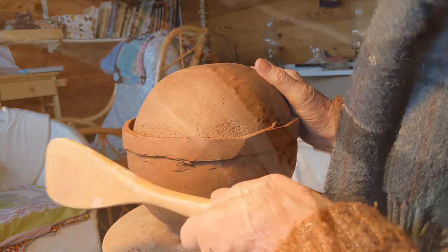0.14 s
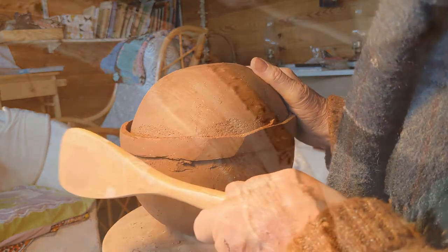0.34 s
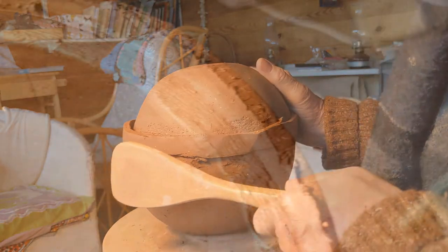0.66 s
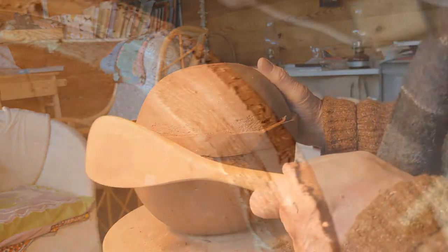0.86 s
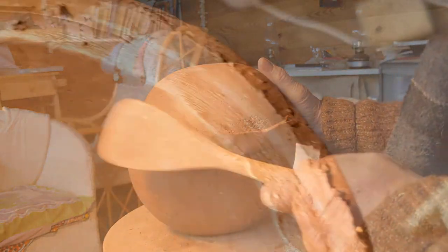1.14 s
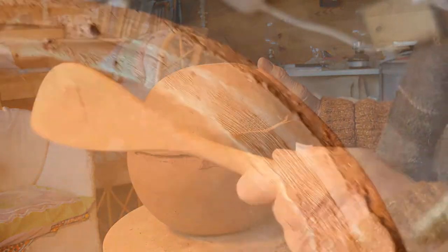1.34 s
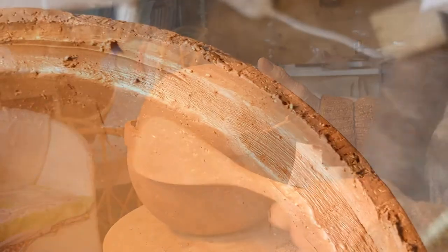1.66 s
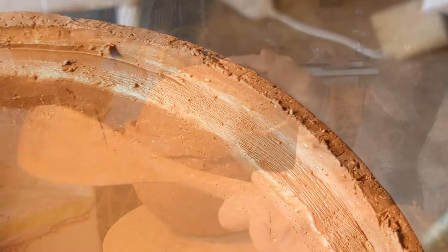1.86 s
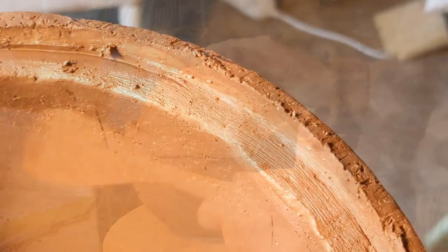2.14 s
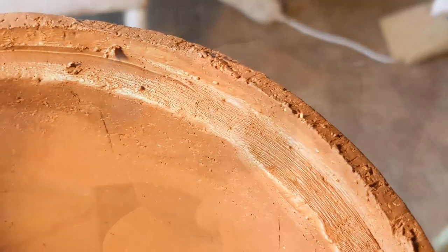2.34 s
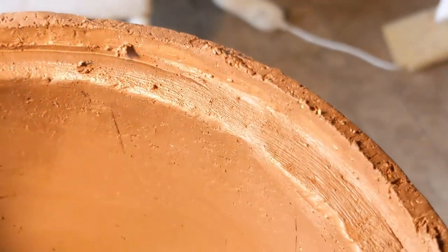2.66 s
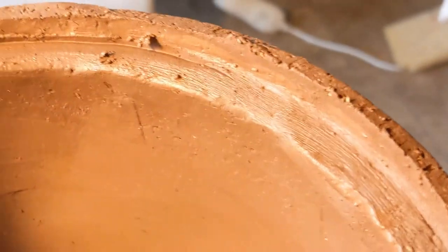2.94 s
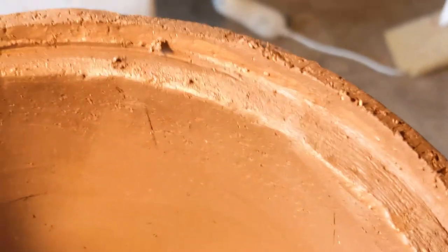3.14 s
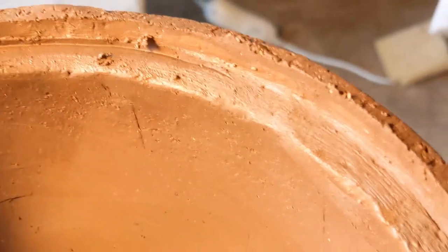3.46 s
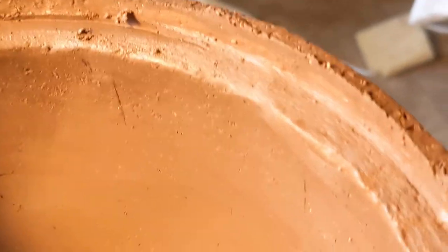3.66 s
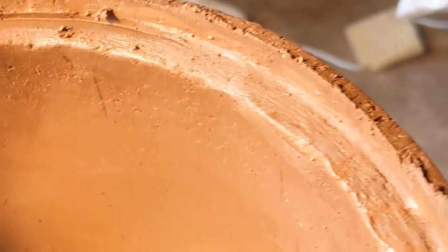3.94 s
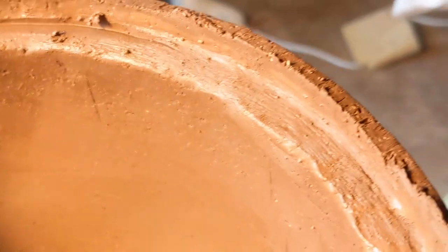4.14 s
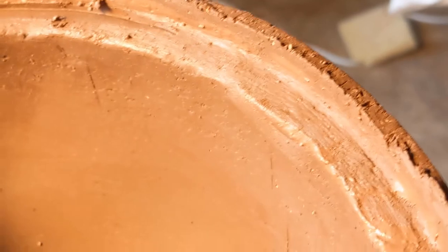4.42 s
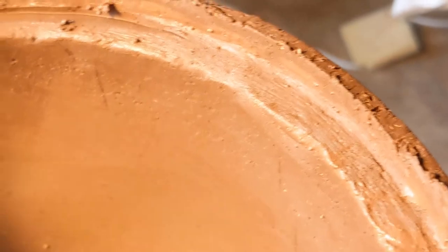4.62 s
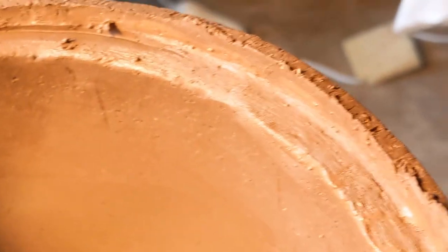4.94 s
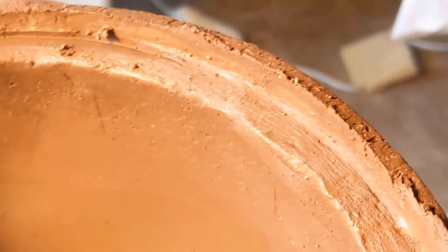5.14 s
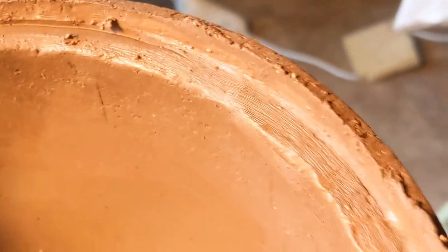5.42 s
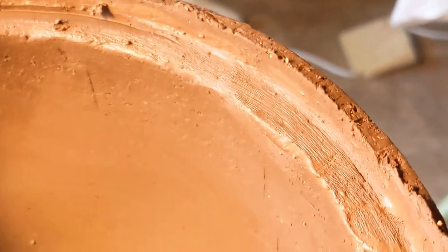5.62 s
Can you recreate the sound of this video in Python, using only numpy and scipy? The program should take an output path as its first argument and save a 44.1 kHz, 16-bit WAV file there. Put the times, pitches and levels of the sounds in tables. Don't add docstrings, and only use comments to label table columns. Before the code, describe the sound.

Quiet hiss and tiny fingertip ticks open the scene. A softer first blow leads into a very even run of sixteen loud wooden cracks, each with a brief hollow clay thump beneath and a quick room echo. Then the blows cease abruptly, and the close perspective shifts to quiet, smooth rubbing on a clay rim over growing low rumble.

```python
import sys
import numpy as np
from scipy import signal
from scipy.fft import rfft, irfft, next_fast_len
from scipy.io import wavfile

SR = 44100
rng = np.random.default_rng(int(sys.argv[2]) if len(sys.argv) > 2 else 0)


def level_to_linear(level):
    exponent = np.asarray(level, float) / 20
    return 10 ** exponent


def file_out(sig):
    cols = np.atleast_2d(sig).T
    lim = np.clip(cols, -1, 1)
    pcm = np.round(lim * 32767).astype(np.int16)
    wavfile.write(sys.argv[1], SR, pcm)


N = 255416
FORCE_N = 200
SCENE_CHANGE_S = 5.275

# start in seconds, then levels in dB of blade ring, pot thump,
# handle ring and slap brightness.
BLOWS = [(1.1912, -24, -34, -36.5, -39), (1.4564, -11.5, -27.5, -27.5, -27.5),
         (1.707, -14.5, -25, -20, -25), (1.9615, -12.5, -29, -19.5, -24.5),
         (2.2118, -14, -31.5, -17.5, -22), (2.4733, -11.5, -31.5, -20, -20),
         (2.7235, -13, -31.5, -19.5, -24.5), (2.9727, -19.5, -37, -20.5, -23),
         (3.237, -12.5, -31, -19.5, -25.5), (3.4866, -14, -30.5, -20, -25),
         (3.7383, -14, -31.5, -20, -23.5), (3.9943, -13, -30.5, -19, -27.5), (4.251, -18.5, -33, -18, -27),
         (4.5042, -15, -28, -20, -25.5), (4.761, -12.5, -30, -21, -25), (5.016, -14.5, -38.5, -22.5, -24)]


def paddle():
    # frequency in Hz, level in dB, t60 in seconds, left minus right in dB.
    knock_modes = [(754.4, -0.5, 0.0059, 1.3), (1026, -1, 0.024, 9.5), (1220, 3, 0.0073, 1),
                   (1750, -10.5, 0.0024, 1.6)]
    blade_modes = [(2087, -11.5, 0.032, -2), (2545, 1, 0.015, 7.5), (2792, -4.5, 0.023, 2),
                   (2810, 7.5, 0.0062, -0.5)]
    handle_modes = [(3573, 7, 0.0068, -1.5), (3976, 3.5, .01, 3), (4430, 6, 0.0032, 0),
                    (5220, 0.5, 0.0089, -6.5), (6034, -5.5, 0.0035, -18)]
    slap_modes = [(6823, 5, 0.0021, -21), (8240, -0.5, 0.0056, -14.5), (8650, 4.5, 0.0019, -7.5),
                  (10380, -6.5, 0.0043, -11), (12230, 2.5, 0.00067, -3), (15200, -7, 0.0054, 0.5)]
    # low edge in Hz, high edge in Hz, level in dB.
    spans = [(648, 2300, 0.5), (1930, 6700, 11), (3280, 6000, 4), (6360, 16000, 17)]
    blade_db, thump_db, handle_db, slap_db = np.array(BLOWS)[:, 1:].T
    knock_db = -26 + 0.1 * (blade_db - blade_db.mean()) + 0.3 * (thump_db - thump_db.mean())
    groups = [(knock_modes, knock_db), (blade_modes, blade_db - 3),
              (handle_modes, handle_db + 6.5), (slap_modes, slap_db + 5)]
    direct, spread = np.zeros((2, N)), np.zeros(N)
    shape = rattle(0.00012, rough=0.5)
    click = rattle(1e-6, rough=0)
    for (modes, level_db), (low_hz, high_hz, span_db) in zip(groups, spans):
        group = np.zeros((2, N))
        for k, (hz, db, t60, pan_db) in enumerate(modes):
            mode = ring(contacts(level_db + db, hz, shape), hz, t60)
            group += (-1) ** k * mode * leaning(pan_db)
        direct += high_pass(group, 0.71 * low_hz)
        push = contacts(level_db + span_db, low_hz, click) + 1e-9 * direct[0]
        spread = -spread + band_pass(push, low_hz, high_hz, order=2)
    direct += band_pass(contacts(blade_db + 10, 2000, click) + 1e-18, 1150, 4100, order=1)
    direct += high_pass(contacts(slap_db + 7, 4000, click), 1300) * leaning(2)
    mode_share = -0.08
    return direct, spread + mode_share * direct[1]


def contacts(level_db, hz, shape):
    turn = np.exp(-2j * np.pi * hz * np.arange(FORCE_N) / SR)
    shape = shape / np.maximum(np.abs(shape @ turn), 1)[:, None]
    scatter_db = rng.normal(0, 1.5, len(BLOWS))
    force = np.zeros(N)
    for s, gain, one in zip(np.array(BLOWS)[:, 0], level_to_linear(level_db + scatter_db), shape):
        at = round(s * SR)
        force[at:at + FORCE_N] += gain * one
    return force


def rattle(length_s, rough):
    t = np.arange(FORCE_N) / SR
    uneven = 1 - rough + rough * rng.standard_normal((len(BLOWS), FORCE_N))
    shape = np.exp(-t / length_s) * uneven
    shape[:, 0] = 2
    return shape


def pot():
    # frequency in Hz, level in dB, t60 in seconds.
    body_modes = [(79.5, -14.5, 0.85), (144.6, -12.5, 0.27), (181.2, -24.5, 0.45), (243.2, -7, 0.13),
                  (261.3, -12.5, 0.24), (304.7, 2, 0.047), (317.3, -8.5, 0.029), (420, -2, 0.033),
                  (478.4, 3.5, 0.022), (520, -24, 0.017)]
    thump_db = np.array(BLOWS)[:, 2] + 4
    push = rattle(0.0001, rough=0)
    body = sum(ring(contacts(thump_db + db, hz, push), hz, t60) for hz, db, t60 in body_modes)
    return high_pass(high_pass(body, 29), 180)


def turned_room(x):
    places = 3
    place = np.searchsorted(np.array(BLOWS)[:, 0] - 0.01, np.arange(N) / SR) % places
    wet = sum(room(x * (place == k)) for k in range(places))
    return signal.sosfilt(signal.cheby2(8, 30, 16300, fs=SR, output="sos"), wet)


def room(x):
    # frequency in Hz, tail level in dB, t60 in seconds, left-right likeness from 0 to 1.
    tail = [(106, -18, 0.062, 0.37), (247, -20.5, 0.32, 1), (546, -27.5, 0.21, 0.074),
            (1390, -9.5, 0.19, 0), (2700, -5.5, 0.21, 0.2), (4960, -8, .19, 0.053), (8360, -19, 0.23, 0),
            (14200, -24.5, 0.048, 0)]
    t, echo = np.arange(SR // 2) / SR, 0
    edges = 50 * 2 ** np.arange(0, 8.6, 0.5)
    for low, high in zip(edges, edges[1:]):
        hz = np.sqrt(low * high)
        mid, side = band_pass(rng.standard_normal((2, len(t))), low, high, order=2)
        t60 = at_hz(tail, hz, order=2)
        build = 1 - np.exp(-t / 0.00033)
        fall = np.exp(-np.log(1000) * t / t60) * build / np.sqrt(t60 * SR / 28)
        echo = echo + level_to_linear(at_hz(tail, hz) + 11.5) * fall * pair(mid, side, at_hz(tail, hz, order=3))
    return signal.fftconvolve(x[None], echo, axes=1)[:, :N]


def ticks():
    # start in seconds, peak in dB, frequency in Hz.
    fingertips = [
        (0.295, -56, 5800),
        (0.303, -58, 5150),
        (0.304, -56, 2310),
        (0.319, -47, 2160),
        (0.545, -55, 4100),
        (0.567, -50, 485),
        (0.574, -50, 910),
        (0.589, -45, 1470),
        (0.621, -65, 571),
    ]
    # start in seconds, peak in dB, frequency in Hz.
    crumbs = [(0.3764, -64, 9800), (0.5192, -49, 6360), (0.5447, -43, 4600), (0.5447, -54, 9500),
              (0.589, -52, 6300), (0.6115, -53, 7440), (0.6214, -43, 4000), (0.6724, -46.5, 6900),
              (0.7214, -58, 7310), (1.6294, -67, 8300), (1.8844, -59.5, 5480), (3.6594, -69, 8160),
              (3.688, -63, 7310), (3.8891, -39.5, 6400), (3.8974, -76, 6220)]
    out = np.zeros(N)
    for rows, t60 in (fingertips, 0.0095), (crumbs, 0.002):
        for s, db, hz in rows:
            click = np.zeros(2000)
            click[0] = level_to_linear(db + 3)
            neighbours = ring(click, 0.75 * hz, t60 / 2) + ring(click, 1.3 * hz, t60 / 2)
            out[round(s * SR):][:2000] += ring(click, hz, t60) - 0.4 * neighbours
    return out


def hands():
    # frequency in Hz, level in dB per Hz.
    scuff_colour = [(350, -75), (600, -28), (1080, -4.5), (1430, -12), (2270, 3.5), (2650, -16), (3480, 0),
                    (3940, -25), (4460, -5), (5710, -4.5), (6120, -14), (6830, -8), (7830, -18),
                    (10500, -18), (16000, -37)]
    brush_colour = [(290, -31), (500, -5), (718, -17), (807, -12), (1480, -16.5), (2070, -20), (4600, -27),
                    (7420, -22.5), (16000, -41)]
    bump_colour = [(90, -14), (150, 7), (280, 2), (450, -11.5), (800, -29)]
    # time of the peak in seconds, peak in dB, rise in dB per second, fall in dB per second.
    scuffs = [
        (.303, -50, 1803, 445),
    ]
    brushes = [
        (.572, -58, 1490, 300),
        (.593, -63, 880, 400),
    ]
    bumps = [
        (.368, -58.5, 248, 202),
        (.585, -65, 152, 400),
        (.731, -67.5, 400, 450),
    ]
    scuff = swells(scuffs) * coloured(scuff_colour, patchy_db=2.5, rate=140)
    brush = swells(brushes) * coloured(brush_colour, patchy_db=4, rate=150)
    return scuff + brush + swells(bumps) * coloured(bump_colour, patchy_db=-0.5, rate=50)


def rubbing():
    # frequency in Hz, level in dB per Hz.
    rub_colour = [(410, -41), (700, -12), (1050, -18), (1160, -12), (1810, -4), (2630, -13.5), (3330, -11),
                  (4010, -17.5), (6280, -18), (15200, -28), (16500, -43.5)]
    drone_colour = [(59, -53), (100, -8), (162, -0.5), (257, -6), (327, 5), (412, -7.5), (524, -8),
                    (612, -4.5), (687, -12), (1000, -7.5), (1300, -26), (2200, -120)]
    # time of the peak in seconds, peak in dB, rise in dB per second, fall in dB per second.
    strokes = [
        (5.446, -59, 350, 250),
        (5.57, -56, 250, 135),
    ]
    drone_swell = [
        (5.6, -59, 30.5, 50),
    ]
    rub = coloured(rub_colour, patchy_db=1, rate=30)
    drone = coloured(drone_colour, patchy_db=1, rate=12)
    rub_gain = np.maximum(level_to_linear(-66.5), swells(strokes))
    drone_gain = np.maximum(level_to_linear(-65.5), swells(drone_swell))
    return second_scene() * (rub_gain * rub + drone_gain * drone)


def second_scene():
    fade_s = 0.02
    return np.clip((np.arange(N) / SR - SCENE_CHANGE_S) / fade_s, 0, 1)


def background():
    # frequency in Hz, level in dB per Hz.
    rumble_colour = [(12, -77.5), (20, -36), (24, -10.5), (35, -11.5), (54, 12), (74, -0.5), (92, -28),
                     (140, -27.5), (180, -48), (310, -120)]
    hiss_colour = [(59, -26.5), (100, 3), (119, 0), (297, -1.5), (529, -7), (684, -9), (745, -9.5),
                   (865, -7.5), (1410, -12), (1540, -12), (3620, -17.5), (6730, -18), (12800, -25.5),
                   (15100, -25.5), (16500, -30)]
    whine_colour = [(6400, -28.5), (6750, -8.5), (6950, -0.5), (7150, -3.5), (7500, -28.5), (9600, -36),
                    (10000, -7.5), (10400, -32.5)]
    # time of the peak in seconds, peak in dB, rise in dB per second, fall in dB per second.
    shakes = [
        (1.4, -59, 41, 7.5),
        (3.64, -67, 7, 25),
        (4.66, -64, 11.5, 9),
    ]
    whine_swells = [
        (.5, -91, 15, 30),
        (3.15, -84, 6, 14),
        (5.6, -94, 30, 5),
    ]
    rumble = coloured(rumble_colour, patchy_db=1.5, rate=3)
    hiss = coloured(hiss_colour, patchy_db=0.4, rate=8)
    whine = coloured(whine_colour, patchy_db=1.5, rate=10)
    growth_db = 18 * np.maximum(np.arange(N) / SR - SCENE_CHANGE_S, 0) + 4 * second_scene()
    rumble_gain = np.maximum(level_to_linear(-65 + growth_db), swells(shakes))
    whine_gain = np.maximum(level_to_linear(-97), swells(whine_swells))
    return rumble_gain * rumble + level_to_linear(-70) * hiss + whine_gain * whine


def ring(clicks, hz, t60):
    r, w = np.exp(-np.log(1000) / (t60 * SR)), 2 * np.pi * hz / SR
    return signal.lfilter([0, np.sin(w)], [1, -2 * r * np.cos(w), r * r], clicks + 1e-18)


def high_pass(x, hz):
    return signal.sosfilt(signal.butter(2, hz, "high", fs=SR, output="sos"), x)


def band_pass(x, low_hz, high_hz, order):
    return signal.sosfilt(signal.butter(order, [low_hz, high_hz], "band", fs=SR, output="sos"), x)


def leaning(pan_db):
    return level_to_linear(np.array([[pan_db], [-pan_db]]) / 2)


def swells(rows):
    t = np.arange(N) / SR
    return sum(level_to_linear(db - np.where(t < s, rise * (s - t), fall * (t - s))) for s, db, rise, fall in rows)


def coloured(spectrum, patchy_db, rate):
    # frequency in Hz, left-right likeness from 0 to 1.
    likeness = [(60, .92), (130, .55), (290, .4), (640, .05), (1400, 0)]
    size = next_fast_len(N)
    hz = np.fft.rfftfreq(size, 1 / SR) + 1
    mid, side = rfft(rng.standard_normal((2, N)), size) * level_to_linear(at_hz(spectrum, hz))
    noise = irfft(pair(mid, side, at_hz(likeness, hz)), size)[:, :N]
    return rms_one(noise * level_to_linear(patchy_db * drift(rate)))


def pair(mid, side, alike):
    alike = np.clip(alike, -1, 1)
    return np.sqrt(1 + alike) * mid + np.sqrt(1 - alike) * side * [[1], [-1]]


def drift(rate):
    r = np.exp(-80 * np.pi * rate / SR)
    slow = signal.lfilter([1], [1, -2 * r, r * r], rng.standard_normal(N // 40 + 2002))[2000:]
    return np.interp(np.arange(N) / 40, np.arange(len(slow)), rms_one(slow))


def at_hz(points, hz, order=1):
    points = np.array(points)
    return np.interp(np.log(hz), np.log(points[:, 0]), points[:, order])


def rms_one(x):
    return x / np.sqrt(np.mean(x ** 2) + 1e-20)


def scene():
    (wood, spread), body, clicks = paddle(), pot(), ticks()
    left_lag = 4
    heard = np.array([np.roll(wood[0] + body + clicks, left_lag), wood[1] + body + clicks])
    echoes = turned_room(spread + body + level_to_linear(-10) * clicks)
    return heard + echoes + hands() + rubbing() + background()


def roll_off(x):
    return signal.sosfilt(signal.butter(12, 17060, fs=SR, output="sos"), x)


def record(dry):
    duck_from_db, ceiling = -28, 0.9
    ahead = round(0.014 * SR)
    duck_db = np.zeros(N)
    for s, _, _, handle_db, _ in BLOWS:
        at = round(s * SR) - 2
        duck_db[at - ahead:at] = 2 * min(duck_from_db - handle_db, 0) * np.minimum(np.linspace(0, 1.5, ahead), 1)
    x = dry * level_to_linear(duck_db)
    x = x / (1 + (x / ceiling) ** 6) ** (1 / 6)
    x = signal.sosfilt(signal.cheby2(10, 50, 17100, fs=SR, output="sos"), x)
    return roll_off(x)


dry = scene()
out = record(dry)
file_out(out)
```